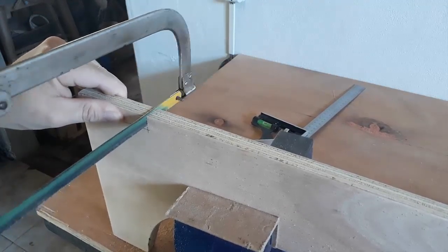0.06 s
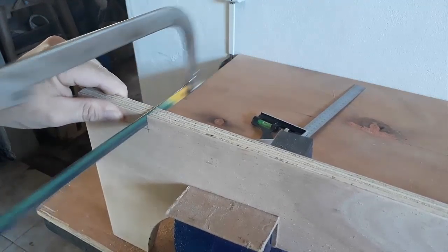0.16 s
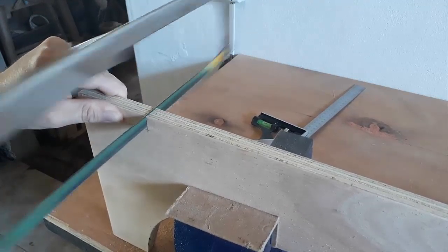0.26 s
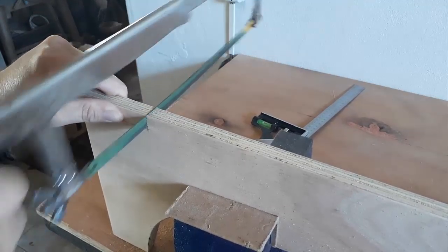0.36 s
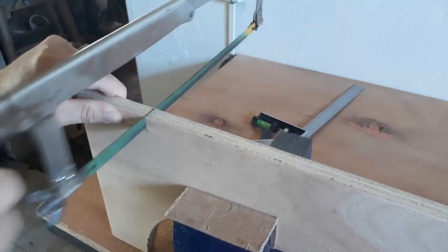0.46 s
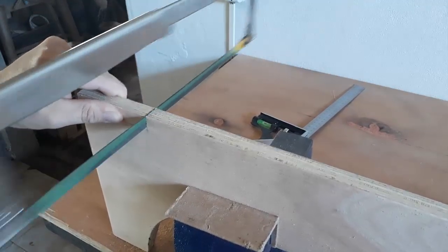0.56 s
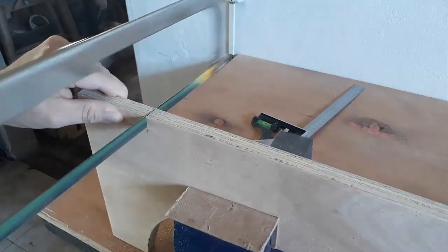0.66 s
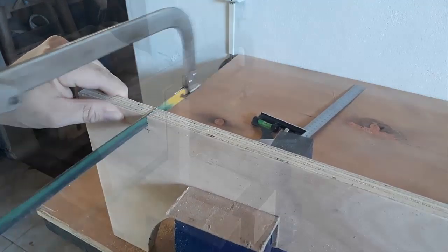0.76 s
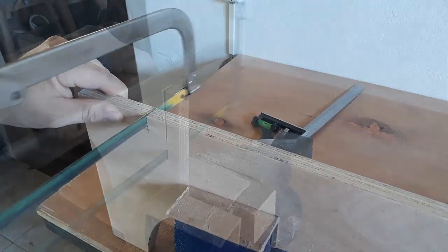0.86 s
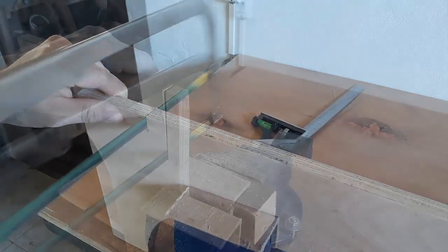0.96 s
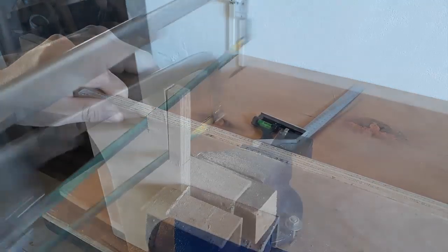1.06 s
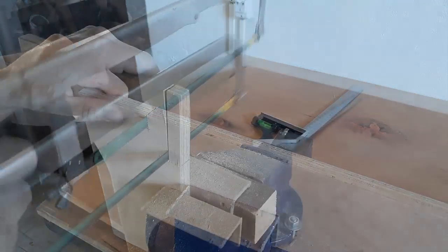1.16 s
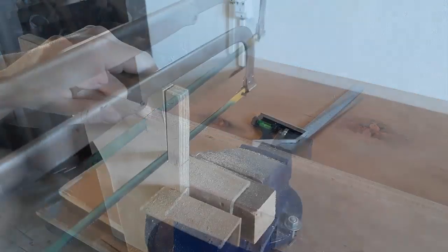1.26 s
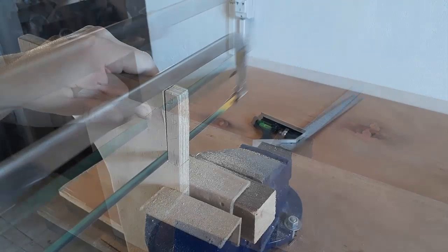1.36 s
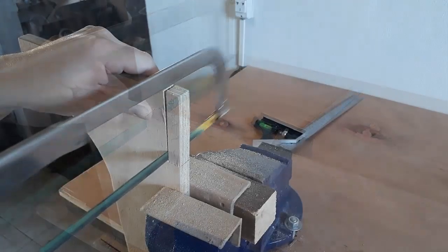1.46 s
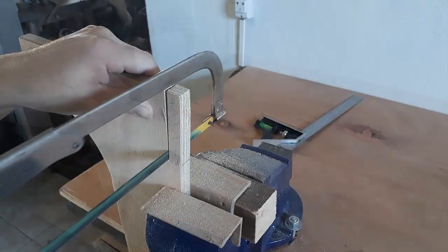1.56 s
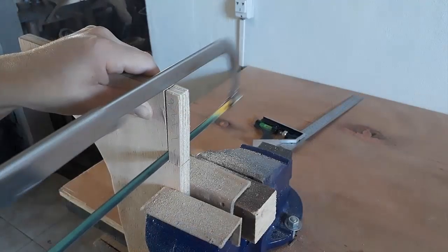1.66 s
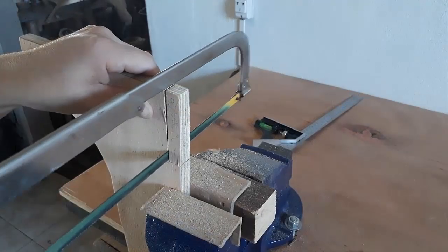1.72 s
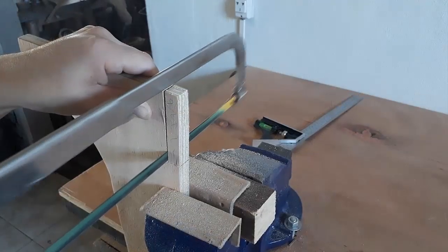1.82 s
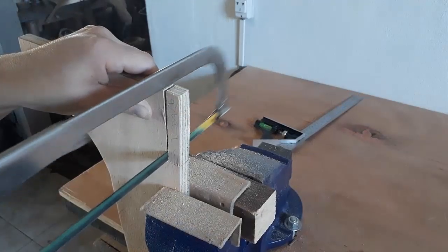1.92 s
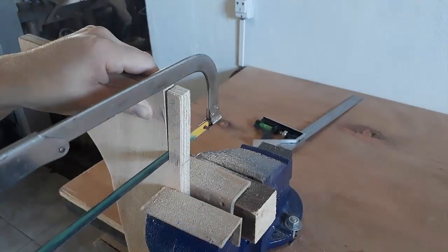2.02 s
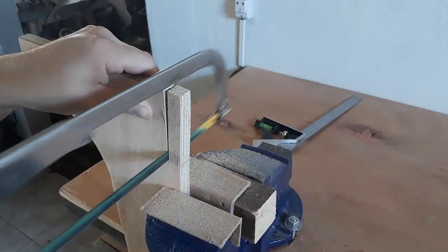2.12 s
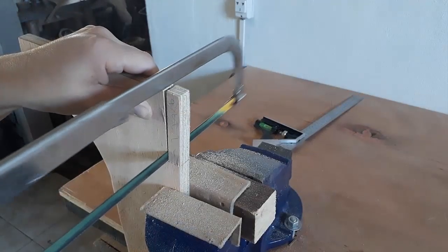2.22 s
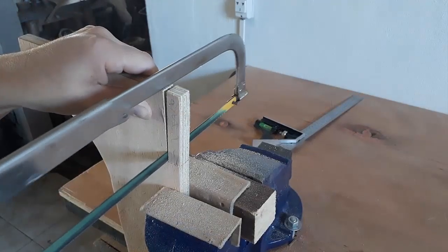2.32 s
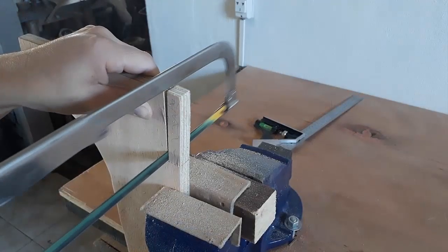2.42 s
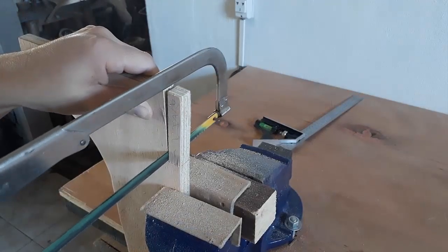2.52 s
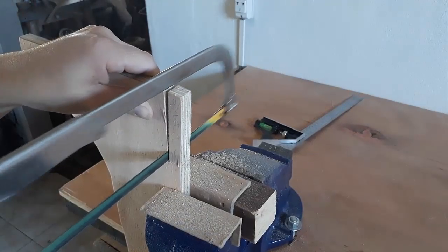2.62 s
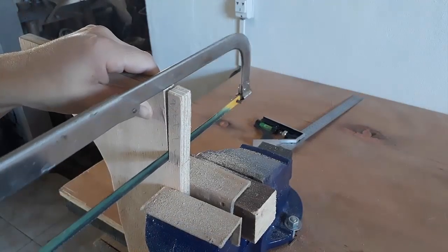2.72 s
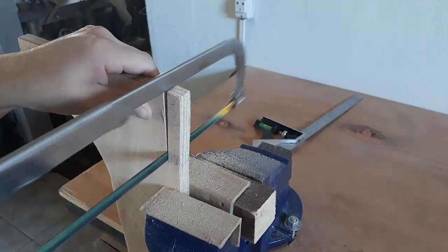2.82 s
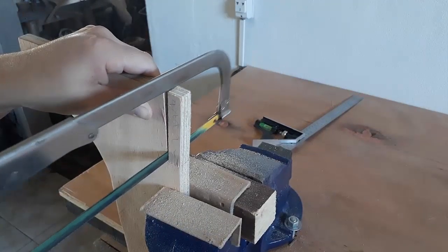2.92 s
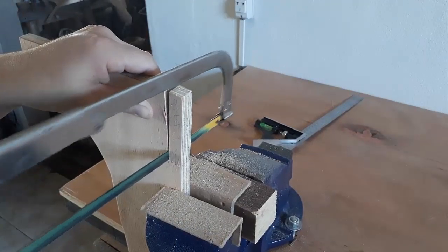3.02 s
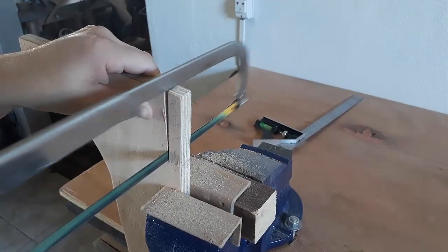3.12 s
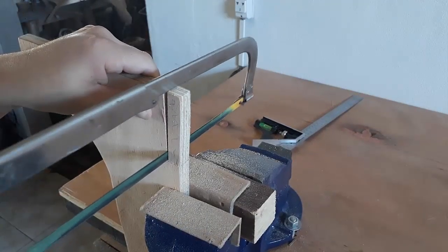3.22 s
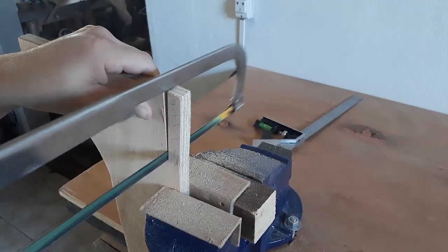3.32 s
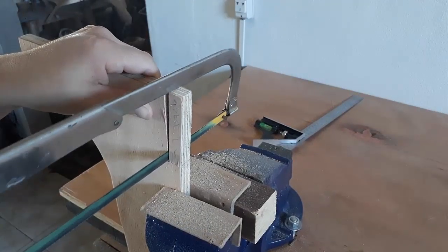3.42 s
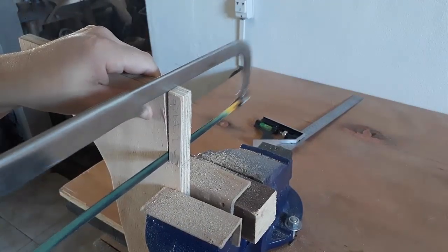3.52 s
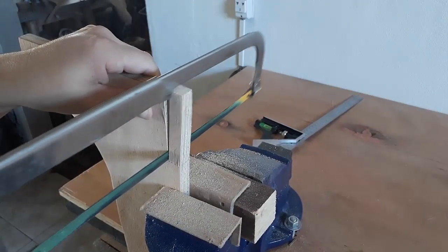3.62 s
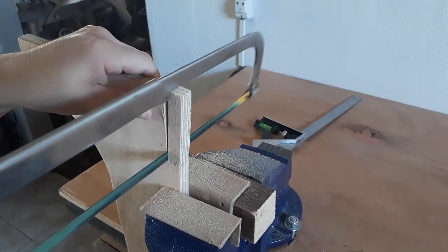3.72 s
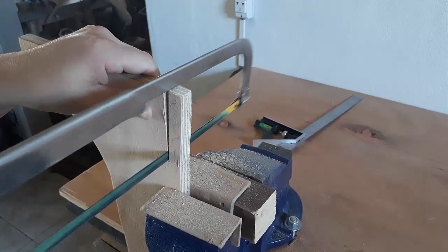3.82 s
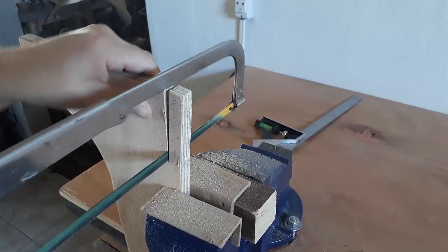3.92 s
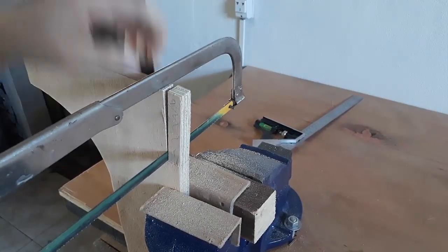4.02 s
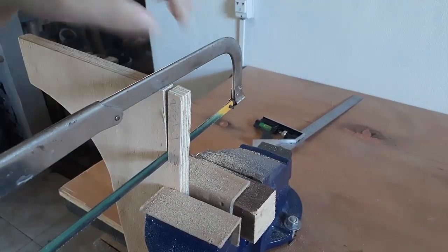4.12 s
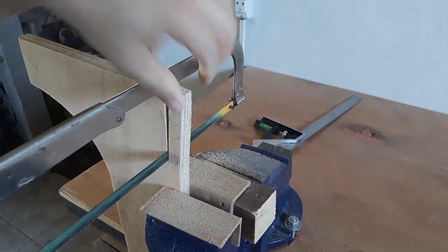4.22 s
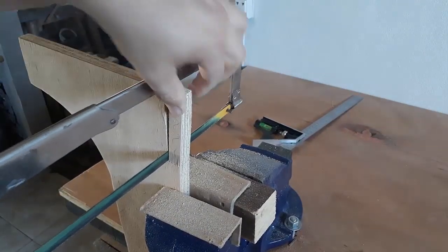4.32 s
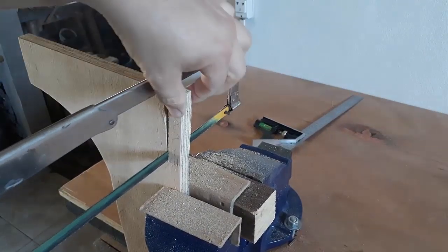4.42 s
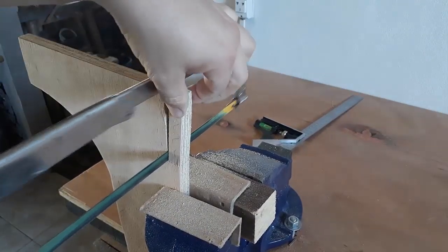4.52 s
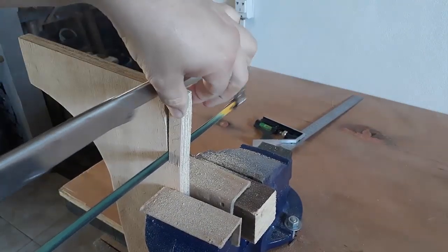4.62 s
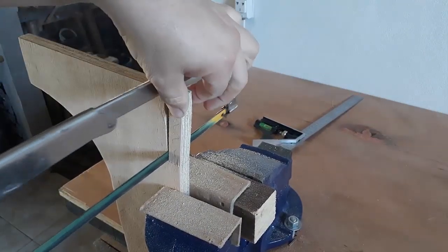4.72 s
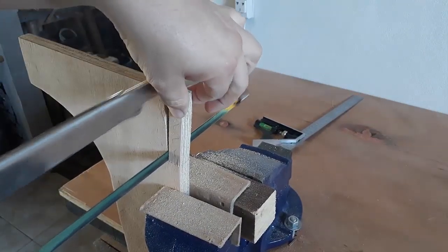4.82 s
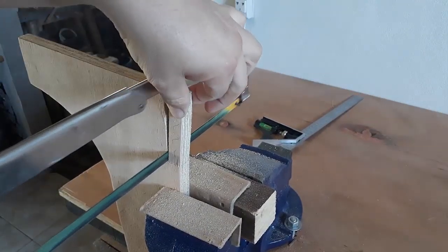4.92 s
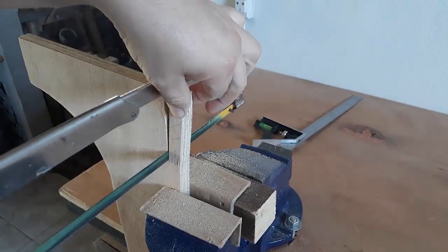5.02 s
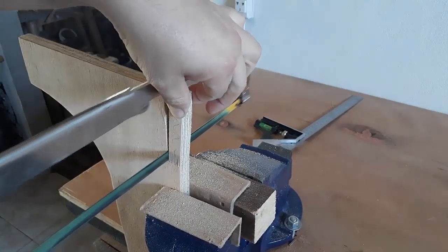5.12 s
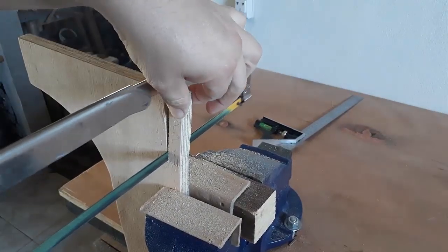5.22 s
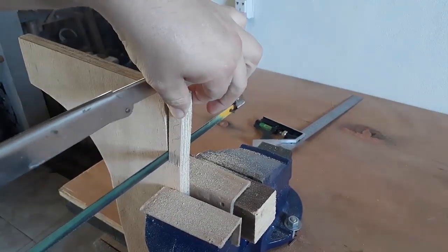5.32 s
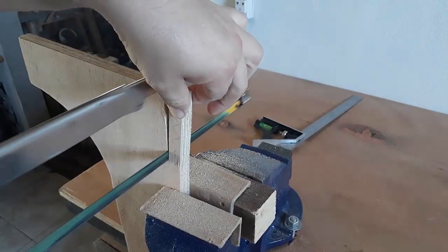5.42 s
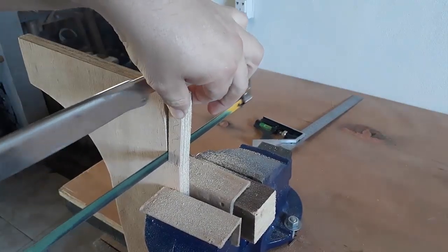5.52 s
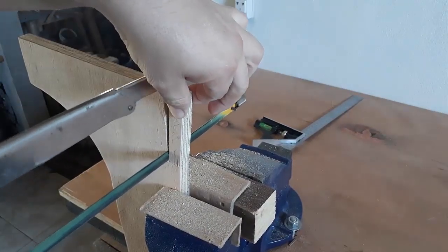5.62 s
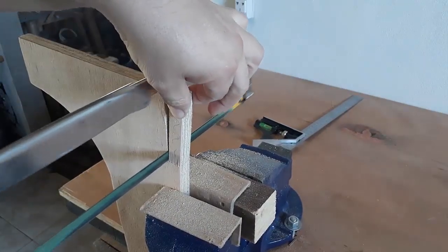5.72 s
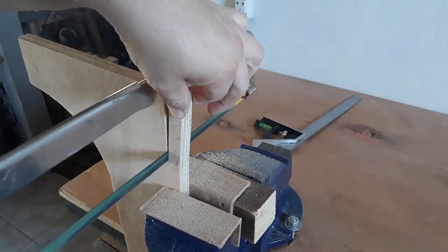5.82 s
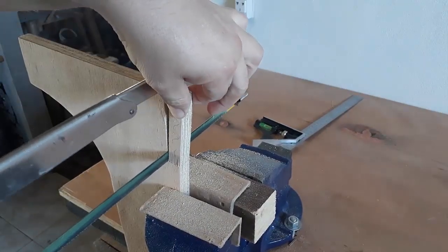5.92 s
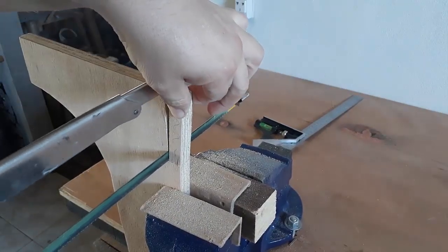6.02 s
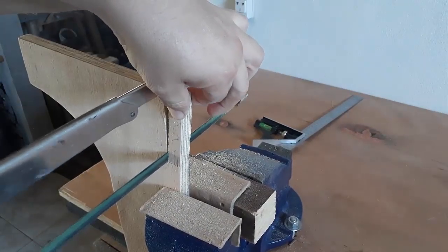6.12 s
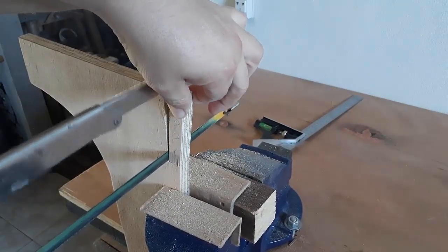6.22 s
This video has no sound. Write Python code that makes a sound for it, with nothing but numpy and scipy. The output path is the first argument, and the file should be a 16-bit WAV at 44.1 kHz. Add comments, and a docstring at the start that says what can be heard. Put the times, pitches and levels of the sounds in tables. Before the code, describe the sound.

Close up in a small workshop, a hacksaw cuts plywood. Three long, loud strokes make the free sheet whoop and resonate, with snags at the end. Then quieter, brisk, drier rasping alternates push and pull on a clamped piece. It stops briefly with tiny metallic ticks, then shorter, duller strokes resume with a few catches, and a near-silent gap before the last stroke.

```python
"""In a small workshop, close by, a hacksaw works to and fro through plywood in a vise.
Periodic tooth impacts and torn-fibre noise, set by the blade's speed, excite the sheet's resonances.
Chips crackle as dense random fractures, the bench rumbles as filtered noise, and the blade rings in decaying modes.
A sheet rings freely; the scene then cuts to a sheet clamped near the saw, which after a pause a hand steadies
for short strokes."""
import sys
import numpy as np
from scipy import signal
from scipy.fft import rfft, irfft
from scipy.io import wavfile
from scipy.ndimage import uniform_filter1d

SR = 44100
rng = np.random.default_rng(int(sys.argv[2]) if len(sys.argv) > 2 else 0)


def file_out(sig):
    """Save sig as 16-bit WAV at sys.argv[1]."""
    # one column per channel
    cols = np.atleast_2d(sig).T
    # limit, then scale
    lim = np.clip(cols, -1, 1)
    pcm = np.round(lim * 32767).astype(np.int16)
    wavfile.write(sys.argv[1], SR, pcm)


N = 276047
TIME = np.arange(N) / SR  # s
TAPS = 8192  # length of impulse responses, samples
FREQS = np.maximum(np.fft.rfftfreq(TAPS, 1 / SR), 1)  # Hz

# strokes of the saw: start_s, end_s, direction, force_db, late_minus_early_force_db
STROKES = [(-0.214, 0.136, "pull", -20, 5), (0.148, 0.496, "push", -25.5, -3.5),
           (0.46, 0.885, "pull", -23.5, 2.5), (0.879, 1.255, "push", -25, -2),
           (1.145, 1.334, "push", -31, -13), (1.347, 1.615, "pull", -33, -3),
           (1.63, 1.829, "push", -28.5, -6.5), (1.836, 2.109, "pull", -34, -9),
           (2.111, 2.361, "push", -32, 1.5), (2.375, 2.62, "pull", -37.5, -3.5),
           (2.637, 2.82, "push", -32, 1.5), (2.832, 3.039, "pull", -34.5, -10.5),
           (3.063, 3.294, "push", -31.5, -7), (3.286, 3.49, "pull", -38, 1.5),
           (3.494, 3.757, "push", -33.5, -10.5), (3.746, 4.005, "pull", -38, -4.5),
           (4.282, 4.477, "pull", -54, 3.5), (4.491, 4.687, "push", -38.5, -9),
           (4.649, 4.804, "pull", -36.5, -1), (4.782, 4.966, "push", -29.5, -5),
           (4.967, 5.11, "pull", -38, -5), (5.095, 5.276, "push", -35.5, -2),
           (5.286, 5.418, "pull", -35, -11), (5.418, 5.577, "push", -32.5, -13),
           (5.573, 5.733, "pull", -41.5, -17), (5.698, 5.871, "push", -32.5, -8),
           (5.89, 6.045, "pull", -35, -9.5), (6.194, 6.41, "push", -36.5, -5)]
# a stroke of usual force, by (support, direction); pushed teeth reach the limit of their bite at a lower speed:
# top_tooth_rate_hz, swell_exponent, knee_share_of_top_speed, relative_scrape_db, relative_chips_db
STROKE_MANNER = {("free", "push"): (620, 2.5, 0.973, 1, -6.5),
                 ("free", "pull"): (490, 4.5, 1.14, -0.5, -9.5),
                 ("clamped", "push"): (450, 2, 0.94, 0, -6.5), ("clamped", "pull"): (450, 2, 1.0, -1.5, -7),
                 ("held", "push"): (350, 2.5, 0.9142, -2.5, -10.5),
                 ("held", "pull"): (350, 2.2, 1.0, -1, -8.5)}
# level of the scrape relative to the wood: time_s, level_db
SCRAPE_LEVEL = [(0, -1), (1.1, -3), (1.25, 2.3), (2.75, 1), (3.2, -2), (4.6, -3), (6.2, -7.5)]
# relative level of the bench's rumble: time_s, level_db
RUMBLE_LEVEL = [(0.0, -47.5), (0.14, -52.5), (0.4, -46), (0.77, -53), (1.18, -48.5), (1.24, -54),
                (1.48, -56), (3.97, -62.5), (4.15, -79.5), (4.93, -56.5), (5.23, -62), (5.51, -53.5),
                (5.61, -56), (5.68, -48.5), (5.84, -62), (6.01, -55), (6.17, -78), (6.26, -62.5)]
# resonances of wood and saw, sheet standing free: frequency_hz, width_hz, level_db
FREE_SHEET = [(101, 96, -21), (209.5, 80, -18), (333, 120, -19), (470.4, 49, -2.5), (583, 150, -11.5),
              (766, 20, -9.5), (824, 120, -7), (1143, 120, -9.5), (1221, 86, -4.5), (1524, 96, -4),
              (1643, 180, -12), (1800, 41, -16.5), (1973, 167, -7), (2298, 210, -18.5), (2510, 130, -7),
              (2630, 360, -13.5), (2967, 180, -10.5), (3160, 145, -17), (3633, 300, -13), (5100, 269, -16),
              (5580, 3300, -20), (7940, 730, -25), (14062, 8700, -38)]
# the same, sheet clamped near the saw: frequency_hz, width_hz, level_db
CLAMPED_SHEET = [(96, 127, -13.5), (165.05, 22.14, -11), (331.5, 57, -11.5), (450, 68, -5.5),
                 (540, 107, -9), (741, 140, -2), (930, 130, -3.5), (1122, 72, -11.5), (1340, 580, -13),
                 (2040, 320, -6), (2159, 129, -26), (2310, 190, -5.5), (2457, 46, -0.5), (2588, 140, -3.4),
                 (2720, 67, -4), (3360, 2600, -20.5), (4034, 187, -11.5), (5000, 3900, -27.5),
                 (7420, 1300, -17), (8700, 430, -23.5), (13300, 8900, -33)]
# the same, with a hand on the sheet: frequency_hz, width_hz, level_db
HELD_SHEET = [(105, 115, -19.5), (157.3, 10.1, -9.5), (359, 51, -5.5), (441, 48, 0), (542, 34, -5.5),
              (729.6, 79, 0.5), (923, 113, 0), (1190, 1080, -19), (1632.6, 129, -27), (2037, 240, -8.5),
              (2308, 20.6, -1.5), (2510, 340, -11.5), (2680, 130, -12), (3230, 350, -23.5),
              (4034, 120, -26.5), (4430, 1700, -37), (6072, 150, -34.5), (7140, 1060, -37.5),
              (8230, 1100, -39), (13600, 8000, -52.5)]
# single teeth flick the blade: time_s, relative_level_db
TICKS = [(0.168, -58), (0.9228, -50), (3.3114, -39.5), (3.8292, -43), (3.86, -50), (3.922, -39.5),
         (4.3031, -39), (4.3714, -43.5), (4.4147, -46), (4.677, -44), (5.9943, -46), (6.2126, -52),
         (6.2393, -43)]
# ringing modes of the tensioned blade: frequency_hz, relative_level_db, t60_s
BLADE_MODES = [(920, -31.5, .2), (2428, -12.5, 0.31), (2710, -5.5, 0.17), (4064, -7, 0.13),
               (6756, -18.5, .1), (7950, -4.5, 0.097), (8500, 1.5, 0.073)]
# the blade catches and jolts the wood: time_s, relative_jolt_db, crack_minus_jolt_db
SNAGS = [(0.921, -31, -5.5), (0.965, -25.5, -19.5), (1.024, -22, -11.5), (1.669, -40, -2), (2.182, -38, 3),
         (3.695, -33.5, -16), (3.797, -39, -15), (5.482, -23.5, -1.5), (5.493, -34, -4), (5.651, -32, -11),
         (5.682, -43, -3), (5.729, -36, -4.5)]
# the saw bumps the bench as it turns round: time_s, relative_level_db
BUMPS = [(2.09, -48), (2.596, -51), (3.0, -46.5), (5.665, -60), (6.02, -57)]
# low modes of the bench: frequency_hz, relative_level_db, t60_s
BENCH_MODES = [(107.3, -0.5, 0.26), (156, -5.5, 0.38)]
# faint squeaks around the pause: start_s, end_s, pitch_hz, peak_db
SQUEAKS = [(4.09, 4.249, 2412, -79.5), (4.14, 4.293, 1805, -77), (4.213, 4.25, 3840, -72)]
# relative spectrum of quiet workshop air: frequency_hz, density_db_per_hz
AIR_SPECTRUM = [(30, -4.5), (100, 1.5), (250, -12), (800, -15.5), (4200, -17), (6000, -27.5),
                (15000, -31.5)]

CLAMPED_SCENE_S = 1.164  # the scene cuts to a sheet clamped near the saw
HOLD_S = 4.2  # from here a hand holds the sheet
CLAMPED_DB = -10  # the sawing is quieter in the clamped scene
# a harder stroke is faster; its chips grow less than the knock of the wood and thin out towards its end
USUAL_DB, RATE_OCTAVES_PER_DB, CHIPS_DB_PER_DB, CHIPS_LEAN_DB = -33, 0.035, 0.85, -3
RUMBLE_DB, AIR_DB = 0.5, -73.5
BUMP_RISE_S = 0.0053
ROOM_T60_S, ROOM_TREBLE_T60_S, ROOM_DB = 0.26, 0.23, -4.5
ROOM_EVEN_HZ = 90  # width over which the room's spectrum is averaged
TOP_HZ = 15900


def undb(db):
    """Level in decibels as an amplitude ratio."""
    return 10 ** (np.asarray(db) / 20)


def unit(x):
    """Normalisation to a root-mean-square of 1."""
    return x / np.sqrt(np.mean(x ** 2))


def ring(x, impulse_response):
    """Linear filtering: convolution of a force with an impulse response."""
    return signal.fftconvolve(x, impulse_response)[:N]


def walk(rate):
    """Band-limited random fluctuation: held random steps smoothed by a moving average, rms 1."""
    hold = max(int(SR / rate), 1)
    steps = np.repeat(rng.standard_normal(N // hold + 1), hold)
    return unit(uniform_filter1d(steps, hold)[:N])


def resonances(modes):
    """Resonance: gain falls steeply with detuning from each mode, and modes add in energy."""
    hz, width, db = np.transpose(modes)[:, :, None]
    detune = (FREQS / hz - hz / FREQS) * hz / width
    return np.sqrt(np.sum((undb(db) / (1 + detune ** 2)) ** 2, axis=0))


def response(gain, lo_hz, hi_hz, order=6):
    """Minimum phase: a band-limited gain curve fixes a causal impulse response, here of unit energy."""
    low_cut = 1 + (lo_hz / FREQS) ** (2 * order)
    high_cut = 1 + (FREQS / hi_hz) ** (2 * order)
    gain = gain / np.sqrt(low_cut * high_cut)
    # folding the cepstrum onto positive times makes the response causal
    cepstrum = irfft(np.log(gain + 1e-6))
    cepstrum[1:TAPS // 2] *= 2
    cepstrum[TAPS // 2 + 1:] = 0
    h = irfft(np.exp(rfft(cepstrum)))
    return h / np.sqrt(np.sum(h ** 2))


def air():
    """Stationary noise: white noise shaped by the spectrum of the quiet room."""
    hz, db = np.transpose(AIR_SPECTRUM)
    colour = undb(np.interp(np.log(FREQS), np.log(hz), db))
    noise = ring(rng.standard_normal(N), response(colour, lo_hz=30, hi_hz=18000))
    return undb(AIR_DB) * unit(noise)


def arm():
    """Saturating bite: teeth dig in as the stroke speeds up, until the weight of the hand limits them."""
    tooth_hz, wood, scrape, chips, moving = np.zeros((5, N))
    for start, end, direction, force_db, lean_db in STROKES:
        middle = (start + end) / 2
        support = "free" if middle < CLAMPED_SCENE_S else "clamped" if middle < HOLD_S else "held"
        usual_hz, swell, knee, scrape_db, chips_db = STROKE_MANNER[support, direction]
        on = slice(*np.searchsorted(TIME, [start, end]))
        late = (TIME[on] - middle) / (end - start)  # -0.5 to 0.5 through the stroke
        speed = np.abs(np.cos(np.pi * late))
        bite = np.tanh((speed / knee) ** swell)
        now_db = force_db + lean_db * late
        top_hz = usual_hz * 2 ** (RATE_OCTAVES_PER_DB * (force_db - USUAL_DB))
        # where strokes overlap the higher tooth rate is kept
        tooth_hz[on] = np.maximum(tooth_hz[on], top_hz * speed ** 1.2)
        wood[on] += bite * undb(now_db)
        scrape[on] += bite * undb(now_db + scrape_db)
        chips_now_db = USUAL_DB + CHIPS_DB_PER_DB * (now_db - USUAL_DB) + chips_db + CHIPS_LEAN_DB * late
        chips[on] += bite * undb(chips_now_db)
        moving[on] = np.maximum(moving[on], speed ** 0.22)
    scrape = scrape * undb(np.interp(TIME, *np.transpose(SCRAPE_LEVEL)))
    bench = moving * undb(RUMBLE_DB + np.interp(TIME, *np.transpose(RUMBLE_LEVEL)))
    return tooth_hz, wood, scrape, chips, bench


def teeth(tooth_hz, jitter, scatter_db, tear_share, octave_db):
    """Periodic excitation: each tooth pushes the wood, raps it on entry and tears fibres ever less until the next."""
    turns = np.cumsum(tooth_hz * np.exp(jitter * walk(150))) / SR  # teeth passed so far
    tooth = turns.astype(int)
    size = undb(scatter_db * rng.standard_normal(N))[tooth]  # one random size per tooth
    entering = np.diff(tooth, prepend=0) > 0
    fundamental = np.sin(2 * np.pi * turns)
    octave = np.sin(4 * np.pi * turns)
    push = size * (fundamental + undb(octave_db) * octave)
    raps = entering * size / np.sqrt(tooth_hz + 300)
    tearing = size * np.exp(-(turns % 1) / tear_share)
    return unit(push), unit(raps), unit(tearing)


def splinters(per_second, spread_db):
    """Random impulses: dense fractures; a positive spread makes a few much larger, a negative one smaller."""
    size_db = spread_db * np.minimum(rng.exponential(size=N), 5)
    sizes = undb(size_db) * rng.standard_normal(N)
    return unit(sizes * (rng.random(N) < per_second / SR))


def saw():
    """Source and resonator: teeth, torn fibres and chips drive the resonances of the sheet as supported."""
    tooth_hz, wood, scrape, chips, bench = arm()
    push, raps, tearing = teeth(tooth_hz, jitter=0.055, scatter_db=1.0, tear_share=0.98, octave_db=0.5)
    # plies and glue lines make the blade bite unevenly
    grain = unit(undb(1.0 * walk(70) + 1.56 * walk(220)))
    clamped = TIME > CLAMPED_SCENE_S  # includes the hand-held part
    bite_level = grain * undb(CLAMPED_DB * clamped)
    jolt, crack = snags()
    # the free sheet sways with every tooth and whoops up and down with the stroke; the clamped one mostly rasps
    whoop = np.where(clamped, undb(-21.5), undb(-13.5)) * push
    torn_fibres = tearing * splinters(per_second=14000, spread_db=1.15)
    rasp = undb(-8) * raps + undb(1.0) * torn_fibres
    crackle = tearing * splinters(per_second=22000, spread_db=-2.2)
    wood_rasp = np.where(clamped, undb(-1.0), undb(-2.0)) * rasp
    wood_force = wood * bite_level * (whoop + wood_rasp) + jolt
    scrape_force = scrape * bite_level * rasp + undb(-8.0) * jolt
    chip_force = chips * bite_level * crackle + crack
    rumble = bench * undb(2.7 * walk(40)) * rng.standard_normal(N)
    bench_force = rumble + undb(-10.5) * jolt
    out = np.zeros(N)
    sheets = [(FREE_SHEET, 0, CLAMPED_SCENE_S), (CLAMPED_SHEET, CLAMPED_SCENE_S, HOLD_S),
              (HELD_SHEET, HOLD_S, np.inf)]
    for modes, start, end in sheets:
        body = resonances(modes)
        on = (TIME >= start) & (TIME < end)
        # each force sounds in its own band of the same body
        out += ring(on * bench_force, response(body, lo_hz=67.95, hi_hz=265.0))
        out += ring(on * wood_force, response(body, lo_hz=240, hi_hz=1757, order=8))
        out += ring(on * scrape_force, response(body, lo_hz=1680, hi_hz=4150, order=8))
        out += ring(on * chip_force, response(body, lo_hz=4056, hi_hz=18000))
    return out


def workshop(x, first_echo_s):
    """Reverberation: bench and walls return a short dense tail, treble dying first, with an even overall colour."""
    age = TIME[:TAPS]
    low_pass = signal.butter(2, 3000, fs=SR, output="sos")
    high_pass = signal.butter(2, 3000, "high", fs=SR, output="sos")
    low = signal.sosfilt(low_pass, rng.standard_normal(TAPS))
    high = signal.sosfilt(high_pass, rng.standard_normal(TAPS))
    tail = low * undb(-60 * age / ROOM_T60_S) + high * undb(-60 * age / ROOM_TREBLE_T60_S)
    tail = tail * (age > first_echo_s)
    direct = age == 0
    room = direct + undb(ROOM_DB) * tail / np.sqrt(np.sum(tail ** 2))
    # divide out the smoothed spectrum to keep the colour even
    colour = np.sqrt(uniform_filter1d(np.abs(rfft(room)) ** 2, int(ROOM_EVEN_HZ * TAPS / SR)))
    room = signal.fftconvolve(room, response(1 / colour, lo_hz=13, hi_hz=SR))
    return ring(x, room / np.sqrt(np.sum(room ** 2)))


def blade_ticks(crack_s, ring_db, level_db):
    """Free vibration: a bright decaying snap, with the thin ring of the steel's damped modes."""
    out, age = np.zeros(N + 2 * TAPS), TIME[:2 * TAPS]
    bright = response(1 / np.sqrt(1 + (FREQS / 9000) ** 2), lo_hz=4200, hi_hz=17900, order=2)
    for s, db in TICKS:
        burst = rng.standard_normal(len(age)) * np.exp(-age / crack_s)
        snap = signal.fftconvolve(burst, bright)[:len(age)]
        steel = np.zeros(len(age))
        for hz, mode_db, t60 in BLADE_MODES:
            strength = undb(mode_db + 2 * rng.standard_normal())
            steel += strength * np.sin(2 * np.pi * hz * age) * np.exp(-np.log(1000) * age / t60)
        at = int(s * SR)
        out[at:at + len(age)] += undb(db + level_db) * (snap + undb(ring_db) * steel)
    return out[:N]


def snags():
    """Transient forces: a catching tooth gives a short noisy judder into the wood and a sharper crack."""
    jolt, crack = np.zeros((2, N))
    age = TIME[:TAPS]
    for s, db, crack_db in SNAGS:
        at = int(s * SR)
        jolt[at:at + TAPS] += undb(db - 7.5) * np.exp(-age / 0.014) * rng.standard_normal(TAPS)
        crack[at:at + TAPS] += undb(db + crack_db - 4.0) * np.exp(-age / 0.0058) * rng.standard_normal(TAPS)
    return jolt, crack


def bumps():
    """Modal decay: soft thuds ring the low modes of the bench, each mode at a random phase."""
    out, age = np.zeros(N + 2 * TAPS), TIME[:2 * TAPS]
    onset = 1 - np.exp(-age / BUMP_RISE_S)
    for s, db in BUMPS:
        thud = np.zeros(len(age))
        for hz, mode_db, t60 in BENCH_MODES:
            tone = np.sin(2 * np.pi * (hz * age + rng.random()))
            thud += undb(mode_db) * tone * np.exp(-np.log(1000) * age / t60)
        at = int(s * SR)
        out[at:at + len(age)] += undb(db) * onset * thud
    return out[:N]


def squeaks(waver):
    """Frequency modulation: thin tones waver at random in pitch while they swell and fade."""
    out = np.zeros(N)
    for start, end, hz, db in SQUEAKS:
        swell = np.sin(np.pi * np.clip((TIME - start) / (end - start), 0, 1))
        cycles = np.cumsum(hz * (1 + waver * walk(200))) / SR
        out += undb(db) * swell * np.sin(2 * np.pi * cycles)
    return out


def scene():
    """Superposition: saw, blade ticks and squeaks through the workshop, plus air and bench thuds."""
    near = saw() + blade_ticks(crack_s=0.0031, ring_db=-7.0, level_db=-7.0) + squeaks(waver=0.0039)
    return (workshop(near, first_echo_s=0.0023) + air() + bumps())[None]


def record(dry):
    """Low-pass filtering: the microphone cuts the top steeply."""
    return signal.sosfilt(signal.ellip(10, 0.2, 70, TOP_HZ, fs=SR, output="sos"), dry)


dry = scene()
out = record(dry)
file_out(out)
```